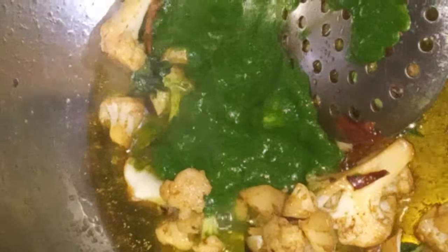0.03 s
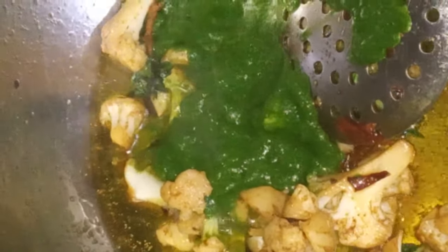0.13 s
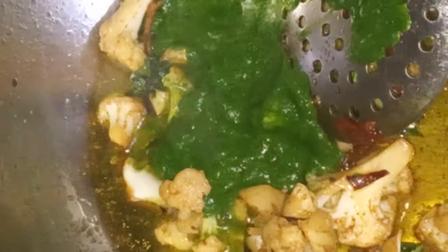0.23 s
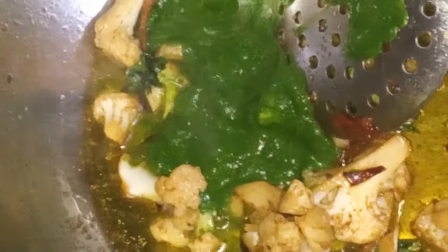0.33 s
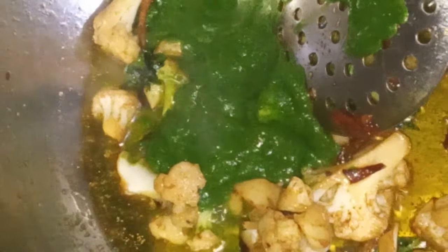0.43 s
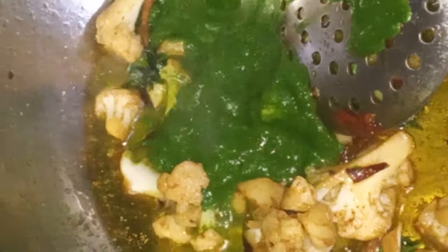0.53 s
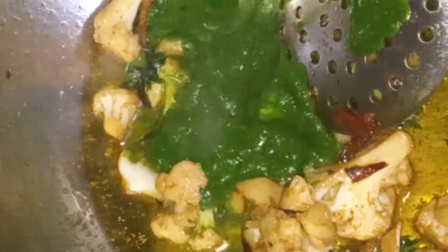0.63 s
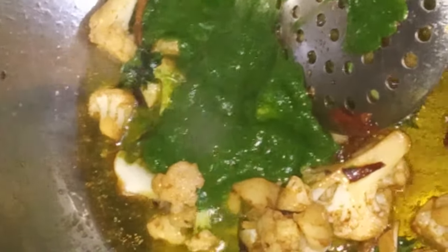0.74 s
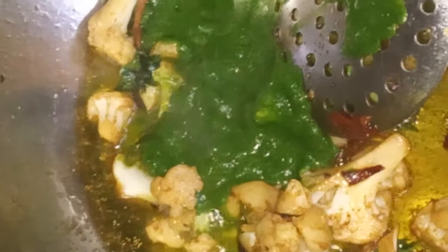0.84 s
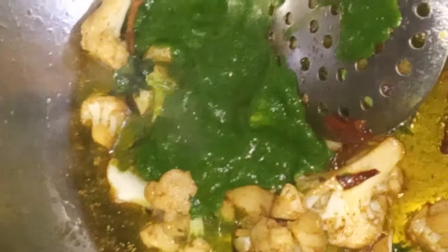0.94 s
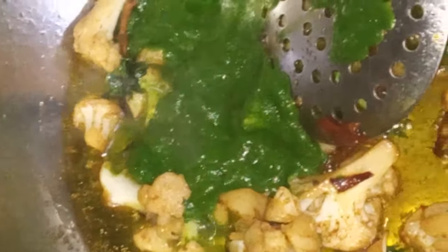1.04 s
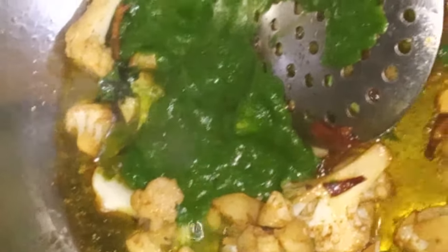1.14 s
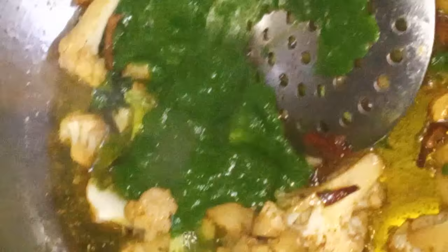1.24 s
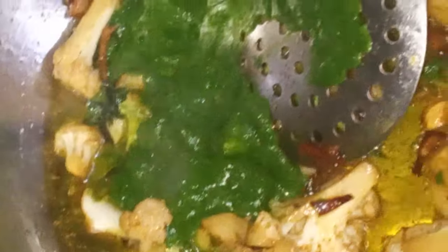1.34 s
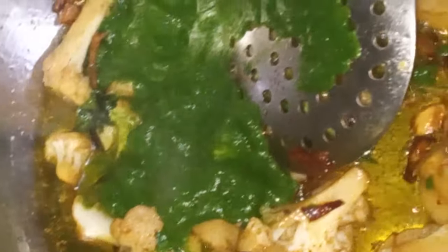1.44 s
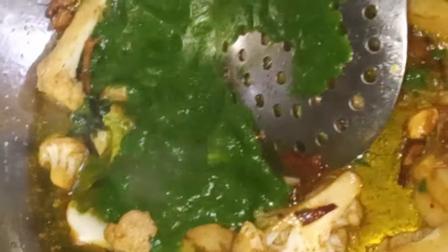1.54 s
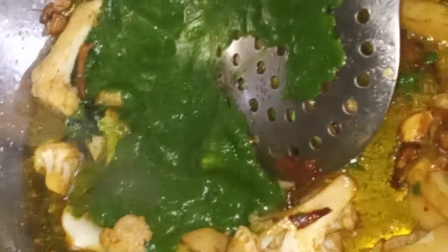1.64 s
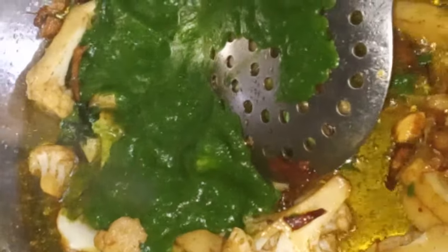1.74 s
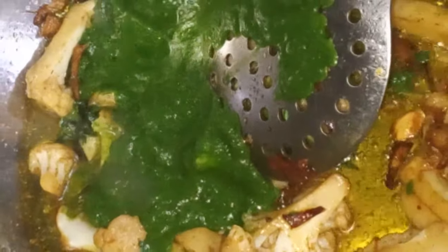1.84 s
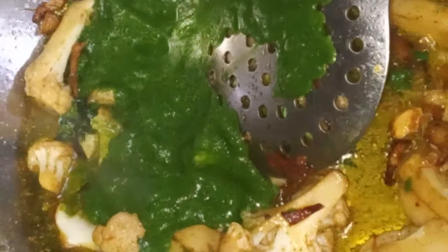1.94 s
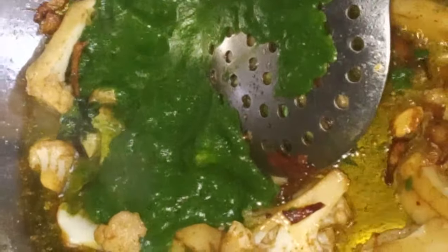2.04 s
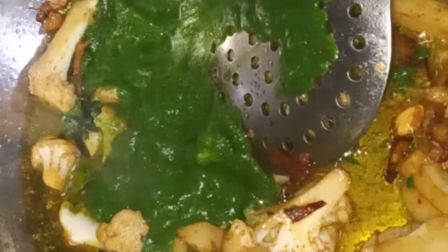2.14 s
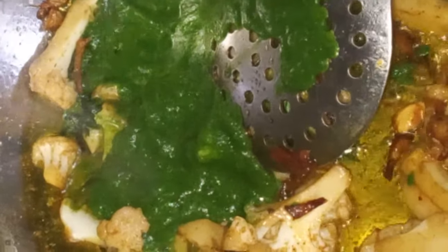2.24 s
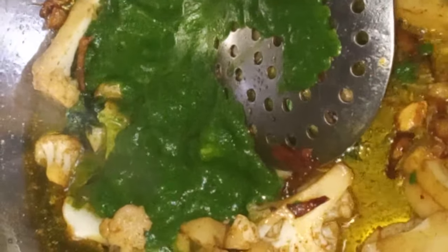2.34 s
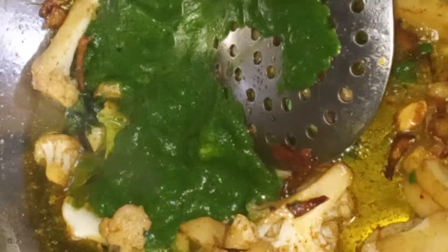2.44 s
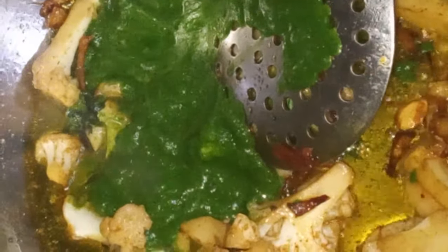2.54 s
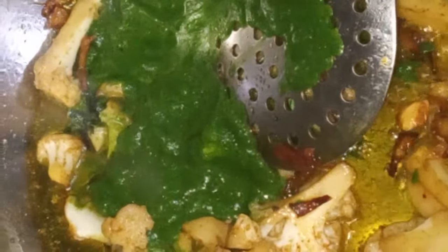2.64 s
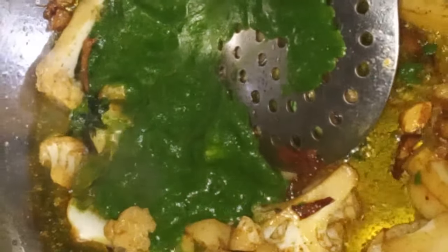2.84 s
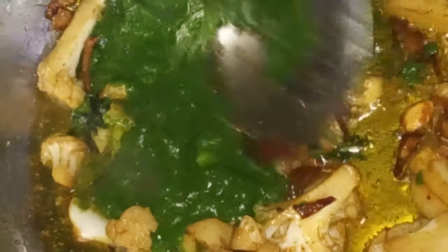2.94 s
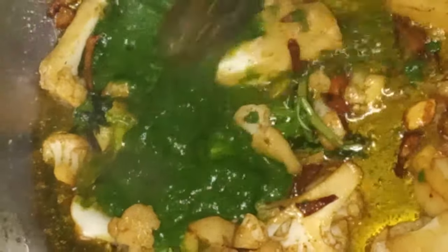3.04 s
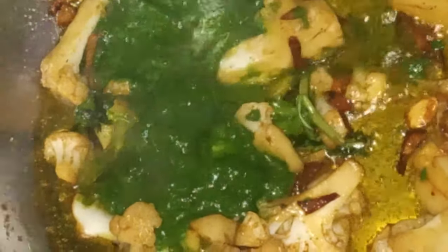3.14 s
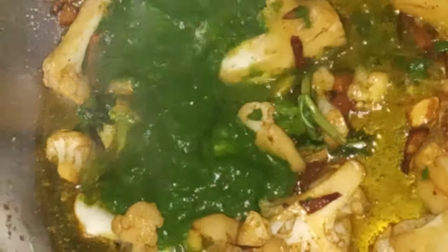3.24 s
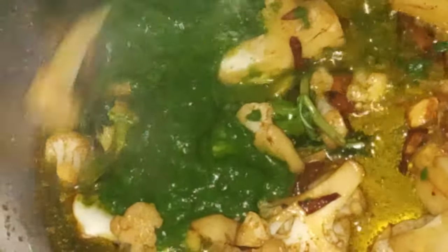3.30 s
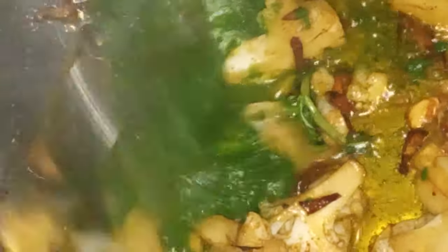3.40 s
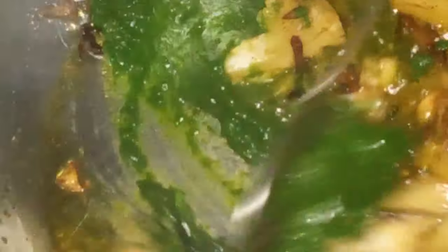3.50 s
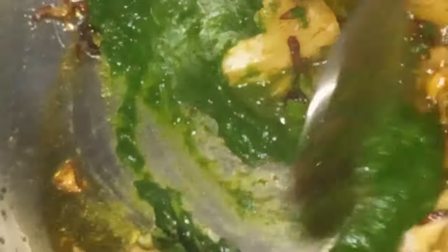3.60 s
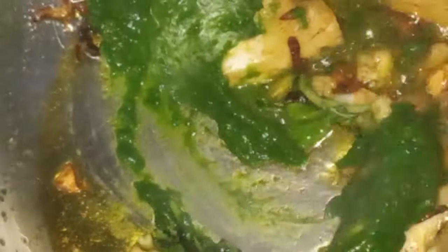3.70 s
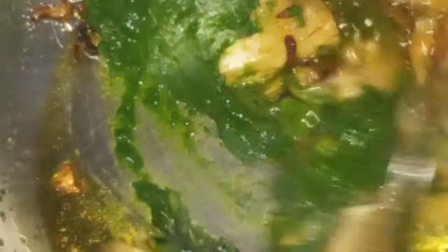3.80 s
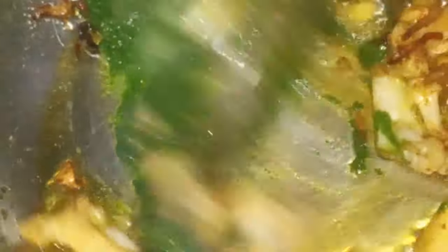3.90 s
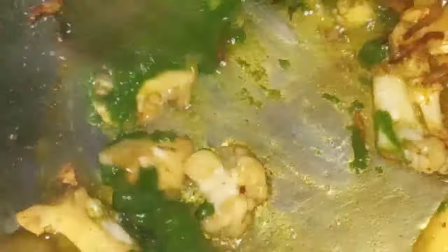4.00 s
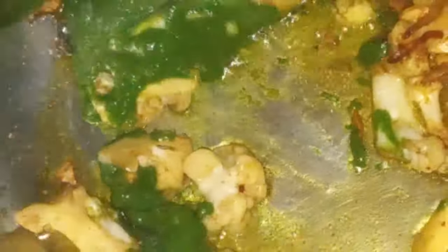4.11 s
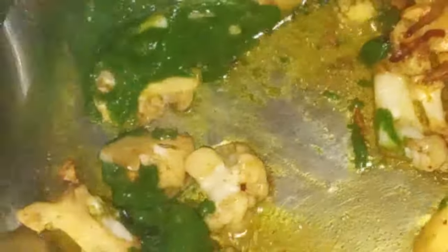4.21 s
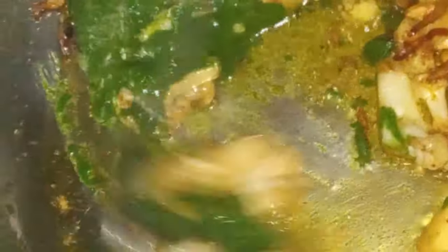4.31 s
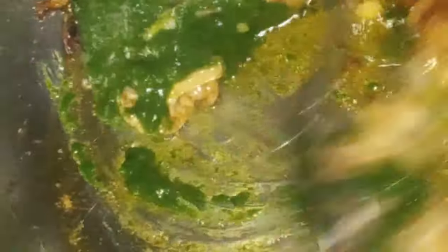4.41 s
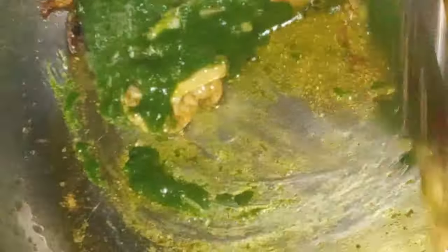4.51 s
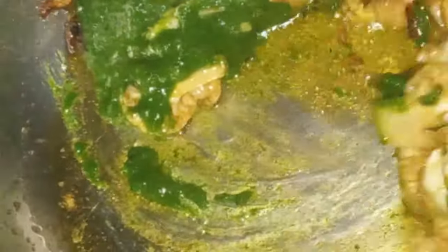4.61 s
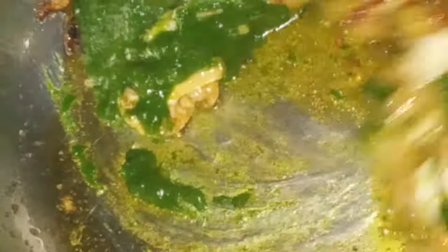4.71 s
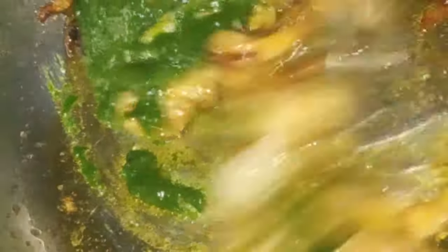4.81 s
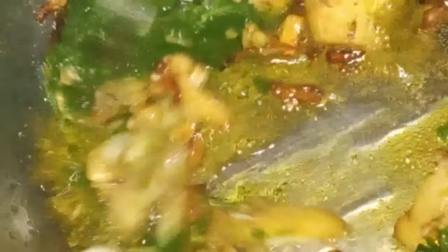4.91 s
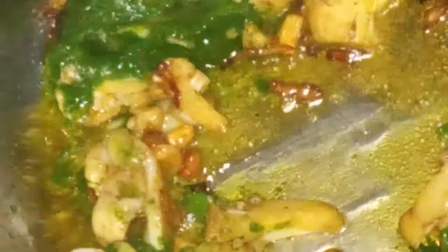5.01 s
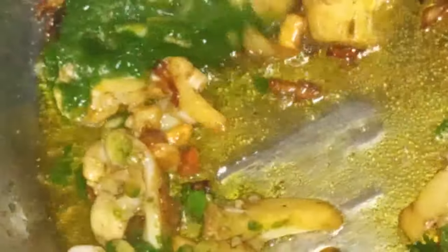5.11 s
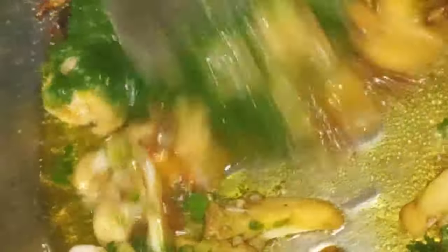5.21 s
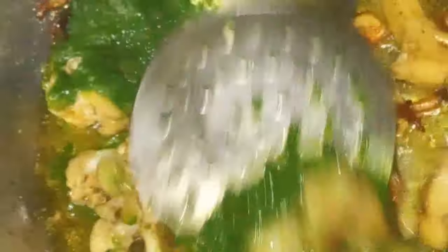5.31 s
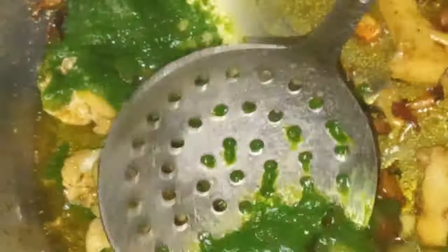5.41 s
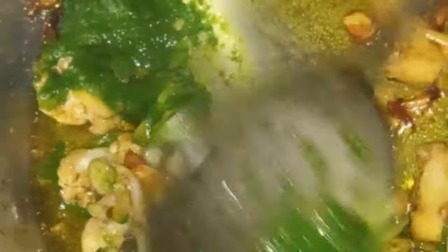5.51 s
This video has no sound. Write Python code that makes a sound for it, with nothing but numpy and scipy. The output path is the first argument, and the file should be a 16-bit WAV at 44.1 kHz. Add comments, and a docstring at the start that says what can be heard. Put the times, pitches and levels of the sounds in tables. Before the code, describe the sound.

Oil fries steadily with a few thick bubbling plops, until a metal spatula starts tapping, scraping and squeaking in the steel pan.

```python
"""Spinach puree and cauliflower sizzle in oil in a steel pan; one microphone close by, in a small kitchen.
Vapour bubbles burst in the oil and set the pan singing faintly; now and then steam plops through the puree.
A slotted steel spatula rests in it, squeaking softly, and after three seconds stirs: it knocks on the
food-damped pan, clangs once on the bare wall, scrapes along the bottom and squeaks.
Behind the pan are the kitchen's low hum and the short echo of its hard walls."""
import sys
import numpy as np
from scipy import signal
from scipy.fft import rfft, irfft
from scipy.io import wavfile

SR = 44100
rng = np.random.default_rng(int(sys.argv[2]) if len(sys.argv) > 2 else 0)


def output_pcm(signal):
    """Save a mono or channel-first signal as 16-bit PCM at the path in sys.argv[1].

    Samples are clipped to [-1, 1] before scaling.
    """
    pcm = np.clip(np.atleast_2d(signal).T, -1, 1) * 32767
    wavfile.write(sys.argv[1], SR, np.round(pcm).astype(np.int16))


N = 244755
TIME, RING_TIME = np.arange(N) / SR, np.arange(SR // 2) / SR

# Levels in spectra and modes are relative; spectra are per Hz.
HUM_SPECTRUM = [(25, -6), (55, -12.5), (85, -0.5), (115, 6), (160, -5.5), (250, -3.5), (500, -5.5),
                (780, 0.5), (1200, -18.5)]  # kitchen background: f/Hz, level/dB
KITCHEN_DECAY = [(200, 0.27), (1000, 0.28), (5000, 0.12), (14000, 0.1)]  # echo of the walls: f/Hz, t60/s

# spatula knocks: t/s, low thud/dB, hollow knock/dB, steel clack/dB, bright tick/dB
SPATULA_KNOCKS = [(3.22, -35.5, -34, -37.5, -34), (3.2750, -33.5, -33, -55.5, -53),
                  (3.4660, -74, -46.5, -58, -71), (3.8900, -40.5, -37, -33, -31),
                  (4.2344, -43, -36, -45.5, -50), (4.6821, -38, -45.5, -38, -33.5),
                  (4.8010, -34.5, -39.5, -35, -72), (4.828, -49, -54, -46, -73),
                  (5.0790, -33.5, -32.5, -32.5, -28.5)]
THUD_MODES = [(255, -4, 0.076), (335.3, 5.5, 0.064), (400, 2.5, 0.051)]  # deepest ring of the loaded pan: f/Hz, level/dB, t60/s
HOLLOW_MODES = [(481, -5.5, 0.01), (627, -16, 0.051), (704, -10, 0.02)]  # its hollow ring above that: f/Hz, level/dB, t60/s
BLADE_MODES = [(1316, -8, 0.062), (1352, -3, 0.031), (1830, -5, 0.027), (2028, 9.5, 0.019),
               (2197, -7.5, 0.085), (2990, -2.5, 0.055), (3572, -6, 0.061), (4410, -3.5, 0.054),
               (5070, -2.5, 0.034)]  # spatula blade: f/Hz, level/dB, t60/s
BLADE_OVERTONES = [(5600, -33, 0.12), (6030, 11, 0.097), (7100, 12, 0.069), (7500, -20, 0.12),
                   (7260, -8, 0.026), (8220, 22, 0.052), (12230, 7.5, 0.06)]  # its short bright ring: f/Hz, level/dB, t60/s
TICK_SPECTRUM = [(1100, -6), (2000, -19), (4000, -11.5), (6200, -14.5), (7500, 3.5), (8400, -15),
                 (9400, -13), (11400, -6), (13500, -44), (15500, -9)]  # steel meeting steel: f/Hz, level/dB
BUMP_SPECTRUM = [(110, -16), (300, -8), (560, -8.5), (900, -5), (1400, -4), (2200, -31), (4000, -61)]  # food bumping the pan: f/Hz, level/dB

WALL_STRIKES = [(3.89, -24), (3.9000, -35), (3.9220, -28), (3.937, -32), (3.9580, -36)]  # the blade hits the pan wall and chatters: t/s, level/dB
WALL_MODES = [(335, -11, 0.44), (766, 7, 0.31), (924, 5.5, 0.34), (1130, 7, 0.29), (1180, 4, 0.47),
              (1365.6, -5.5, 0.69), (1480, -16, 0.13), (2180, 12, 0.36), (2370, -1, 0.19),
              (2350, 13, 0.055), (2534, 5, 0.12), (3100, -39, .26), (3130, -38, 0.12), (3910, 1.5, 0.4),
              (3930, -11, 0.43), (3860, 8.5, 0.2), (5023, 2, 0.2), (5600, -23, 0.28), (6180, 22.5, 0.039),
              (7100, 0, 0.17)]  # bare pan wall: f/Hz, level/dB, t60/s
CROWD_SPECTRUM = [(200, -17), (290, 5.5), (480, -15), (680, -5), (1100, 5), (1600, -6), (2300, 3.5),
                  (3000, -7.5), (7600, -4), (9300, -25), (11400, -21.5), (15000, -28)]  # the wall's crowd of lesser modes: f/Hz, level/dB
CROWD_DECAY = [(250, 0.42), (1100, 0.33), (2500, 0.33), (7000, 0.22), (12000, 0.54)]  # how long those ring: f/Hz, t60/s

# strokes over the bottom: firmest press t/s, build-up/s, steel grinding/dB, wet hiss/dB
BLADE_STROKES = [(3.08, 0.43, -66, -53), (3.499, 0.081, -48.5, -58), (3.718, 0.043, -57, -44.5),
                 (3.863, 0.2, -47, -69), (4.4, 0.023, -44.5, -43), (4.482, .1, -51.5, -48.5),
                 (4.585, 0.035, -48, -62), (4.67, 0.085, -45, -57), (4.765, 0.12, -42, -49),
                 (4.85, 0.17, -49, -42.5), (5.0, 0.22, -69, -45), (5.127, 0.022, -40, -41),
                 (5.2, 0.037, -35, -33.5), (5.296, 0.057, -43.5, -38.5)]
FOOD_SHOVES = [(3.42, -44.5), (3.495, -52), (3.788, -55.5), (3.863, -60), (4.295, -52.5), (4.75, -44.5),
               (4.85, -57), (5.126, -37), (5.197, -42.5)]  # the blade pushes a heap: t/s, level/dB
SHOVE_SPECTRUM = [(190, -18.5), (340, 2.5), (510, -8), (660, -1.5), (850, -5), (1100, -16.5), (2500, -40)]  # pushed food: f/Hz, level/dB
GRIT_SPECTRUM = [(700, -15.5), (1050, -26.5), (1400, 7), (1800, -9), (2400, -2), (3200, -5), (4500, -3.5),
                 (8000, -15), (10000, -24)]  # grit under the blade: f/Hz, level/dB
HISS_SPECTRUM = [(2500, -33), (4200, -9), (5300, 0.5), (6200, -1.5), (7000, -13), (7900, -4), (9400, -25.5),
                 (11400, -3), (13500, -28), (15600, -13)]  # wet food on hot steel: f/Hz, level/dB
BLADE_SQUEAKS = [(1.091, 0.091, 3620, 250, -59), (1.507, 0.13, 3690, 140, -62.5),
                 (1.669, 0.062, 3590, 160, -58.5), (2.472, 0.035, 3700, 200, -54.5),
                 (3.398, 0.057, 655, 40, -45), (3.778, 0.085, 781, 59.6, -56.5),
                 (3.81, 0.071, 3350, 900, -51), (4.316, 0.15, 6170, 199, -52.5),
                 (4.437, 0.081, 3050, 505, -49), (5.101, 0.078, 7520, 700, -41.5),
                 (5.147, 0.023, 1420, 153, -37), (5.186, 0.017, 2430, 201.1, -38.5),
                 (5.383, 0.17, 3840, 820, -51), (5.413, 0.061, 3720, 100, -36.5),
                 (5.46, .1, 3620, 274, -44.5)]  # judder on the steel: t/s, length/s, f/Hz, rasp width/Hz, level/dB

# steam bubbles in the puree: t/s, puff f/Hz, puff level/dB, gulp delay/s, gulp f/Hz, gulp level/dB
STEAM_PLOPS = [(0, 1700, -84, 0, 292, -63), (0.405, 2060, -59, 0, 313, -68),
               (1.3, 1760, -41.5, 0.047, 247, -48.5), (1.965, 930, -55.5, 0, 278, -63),
               (2.165, 1720, -48.5, .1, 240, -63.5), (2.67, 644, -69.5, 0, 250, -69.5)]
PAN_RESONANCES = [(371, 72, -79.5), (767, 68, -76), (1327, 120, -72.5), (1518, 58, -76.5), (2510, 280, -68),
                  (2942, 370, -71), (3595, 87, -68)]  # stirred by the bubbling: f/Hz, width/Hz, level/dB
OIL_SPECTRUM = [(500, -24), (800, -16.5), (1050, -14.5), (1380, -15.5), (1800, -7.5), (2600, -10.5),
                (4300, -7), (6000, 1.5), (8200, -0.5), (9700, -7.5), (11400, 4), (12700, -9), (14000, -13),
                (15400, -5.5)]  # frying oil: f/Hz, level/dB
FRYING_LEVEL = [(0, -50.5), (0.6, -50), (1.2, -50), (1.8, -50), (2.4, -50.5), (3.0, -49.5), (3.6, -47.5),
                (4.2, -48.5), (4.8, -46.5), (5.55, -46.5)]  # how hard it fries: t/s, level/dB
OIL_SPITS = [(2.884, -66), (3.513, -58), (4.171, -81), (4.928, -48), (4.992, -53), (5.254, -42),
             (5.365, -50)]  # single spits: t/s, level/dB


def amp(db):
    """Decibels to gain."""
    return 10 ** (np.asarray(db) / 20)


def unit(x):
    """Scales a steady sound to rms 1."""
    return x / np.sqrt(np.mean(x ** 2) + 1e-20)


def unit_blow(x, blow_s=0.03):
    """Scales a short sound to the energy of rms 1 over one blow."""
    return x / np.sqrt(np.sum(x ** 2) / (blow_s * SR) + 1e-20)


def read(points, hz):
    """Reads a table over log frequency."""
    f, value = np.transpose(points)
    return np.interp(np.log(hz + 1), np.log(f + 1), value)


def add(mix, s, sound):
    """Adds a sound at time s."""
    part = mix[max(round(s * SR), 0):][:len(sound)]
    part += sound[:len(part)]


def colour(x, spectrum, size=4096):
    """Causal filter with the given spectrum, falling away below its first point."""
    hz = abs(np.fft.fftfreq(size, 1 / SR))
    log_gain = np.log(amp(read(spectrum, hz)) * np.clip(hz / spectrum[0][0], 0.01, 1) ** 2)
    taps = np.fft.ifft(np.exp(np.conj(signal.hilbert(log_gain)))).real[:size // 2]
    return signal.oaconvolve(x, taps)[:len(x)]


def ring(modes, detune=0, scatter_db=0):
    """Dying modes; pitch and share change with the spot that is struck."""
    t, out = RING_TIME, 0
    for (hz, db, t60), (shift, share, sign) in zip(modes, rng.uniform(-1, 1, (len(modes), 3))):
        decay = amp(db + scatter_db * share - 60 * t / t60)
        out = out + np.sign(sign) * decay * np.sin(2 * np.pi * hz * (1 + detune * shift) * t)
    return unit_blow(out)


def tail(t60s):
    """Noise whose bands die at their own speeds."""
    hz, t, bands = signal.stft(rng.standard_normal(len(RING_TIME)), SR, nperseg=256)
    decay = amp(-60 * t / read(t60s, hz)[:, None])
    return signal.istft(bands * decay, SR, nperseg=256)[1][:len(RING_TIME)]


def wander(per_s):
    """Smooth random drift of rms 1."""
    steps = int(N / SR * per_s * 8) + 2
    lowpass = np.exp(-(8 * np.fft.rfftfreq(steps)) ** 2)
    smooth = irfft(rfft(rng.standard_normal(steps)) * lowpass, steps)
    return unit(np.interp(TIME, np.linspace(0, N / SR, steps), smooth))


def crackle(per_s, spread_db):
    """Random tiny clicks; the wider the spread, the more a few stand out."""
    size = amp(spread_db * np.minimum(rng.exponential(1, N), 5))
    return unit(size * rng.choice([-1, 1], N) * (rng.random(N) < per_s / SR))


def shifting(x, depth_db, span_hz, span_s):
    """Narrow resonances come and go as the contact moves over the pan."""
    bands = signal.stft(x, SR, nperseg=1024, noverlap=768)[2]
    field = np.fft.fft2(rng.standard_normal(bands.shape))
    across = np.fft.fftfreq(bands.shape[0], SR / 1024)[:, None] * span_hz
    along = np.fft.fftfreq(bands.shape[1], 256 / SR) * span_s
    patches = unit(np.fft.ifft2(field * np.exp(-(2 * across) ** 2 - (2 * along) ** 2)).real)
    return unit(signal.istft(bands * amp(depth_db * patches), SR, nperseg=1024, noverlap=768)[1][:N])


def swing(width_hz, size):
    """The random swing of a resonance of the given width, fed by countless small kicks."""
    kicks = rng.standard_normal(size) + 1j * rng.standard_normal(size)
    return signal.sosfilt(signal.butter(2, width_hz / 2, fs=SR, output="sos"), kicks)


def swell(s, rise_s, fall_s):
    """Grows by 20 dB per rise_s up to time s, then dies by 20 dB per fall_s."""
    return amp(-20 * np.minimum(np.maximum((s - TIME) / rise_s, (TIME - s) / fall_s), 10))


def puff(pitch_hz, width, swell_s, t60):
    """A soft rush of air through a cavity swells and dies; width is relative to the pitch."""
    t = RING_TIME
    hz = np.fft.rfftfreq(len(t), 1 / SR) + 1
    cavity = 1 / (1 + (np.log(hz / pitch_hz) / width) ** 4)
    rush = unit(irfft(rfft(rng.standard_normal(len(t))) * cavity, len(t)))
    return rush * np.minimum(t / swell_s, 1) * amp(-60 * np.maximum(t - swell_s, 0) / t60)


def kitchen_hum():
    """Room tone: a steady low noise, well behind the pan."""
    return amp(-70) * unit(colour(rng.standard_normal(N), HUM_SPECTRUM))


def kitchen_echo(x):
    """The near, hard walls send a short echo back to the microphone."""
    echoes = tail(KITCHEN_DECAY) * (1 - np.exp(-RING_TIME / 0.0024))
    return signal.oaconvolve(x, echoes / np.linalg.norm(echoes))[:N]


def squeaks():
    """Stick and slip of the blade locks onto one mode; the looser the lock, the raspier."""
    out = np.zeros(N)
    for s, length_s, hz, width_hz, db in BLADE_SQUEAKS:
        grip = swing(width_hz, size=len(RING_TIME))
        grip = grip / np.sqrt(abs(grip) + 1e-12)  # friction limits the swing
        tone = (grip * np.exp(2j * np.pi * hz * RING_TIME)).real[-round(length_s * SR):]
        add(out, s, amp(db) * unit(tone * signal.windows.tukey(len(tone), 0.6)))
    return out


def stirring():
    """The blade shoves food, slips over the steel and lays wet food on the hot metal."""
    shove = sum(amp(db) * swell(s, rise_s=0.037, fall_s=0.052) for s, db in FOOD_SHOVES)
    grind = sum(amp(db) * swell(s, rise_s, fall_s=0.042) for s, rise_s, db, _ in BLADE_STROKES)
    flare = sum(amp(db) * swell(s, rise_s, fall_s=0.05) for s, rise_s, _, db in BLADE_STROKES)
    food = unit(colour(crackle(per_s=2500, spread_db=0), SHOVE_SPECTRUM)) * shove
    grit = colour(crackle(per_s=5400, spread_db=1.5) * amp(3.5 * wander(per_s=180)), GRIT_SPECTRUM)
    slips = shifting(grit, depth_db=4.5, span_hz=140, span_s=0.07) * grind
    upper_wall = ring([mode for mode in WALL_MODES if mode[0] > 1250])
    wall_ring = signal.oaconvolve(slips, upper_wall / np.linalg.norm(upper_wall))[:N]
    steam = colour(crackle(per_s=6000, spread_db=3), HISS_SPECTRUM)
    hiss = shifting(steam, depth_db=4, span_hz=170, span_s=0.05) * flare
    return food + amp(-1) * slips + amp(-10) * wall_ring + hiss


def knocks():
    """The spatula lands on the loaded pan: a tick, a clack of the blade and a dull thud."""
    out, t = np.zeros(N), RING_TIME
    steel_onset = 1 - np.exp(-t / 0.0003)
    cushioned_onset = 1 - np.exp(-t / 0.0015)  # the food softens the blow
    for s, thud_db, hollow_db, clack_db, tick_db in SPATULA_KNOCKS:
        contact = rng.standard_normal(len(t)) * (np.exp(-t / 0.0032) + 0.66 * np.exp(-t / 0.012))
        tick = unit_blow(colour(contact, TICK_SPECTRUM))
        tick += amp(-6) * ring(BLADE_OVERTONES, detune=0.018, scatter_db=2.5)
        clack = ring(BLADE_MODES, detune=0.061, scatter_db=8)
        clack += amp(-9.5) * unit_blow(colour(contact, GRIT_SPECTRUM))
        add(out, s, (amp(tick_db) * tick + amp(clack_db) * clack) * steel_onset)
        thud = amp(thud_db) * ring(THUD_MODES, detune=0.022)
        hollow = amp(hollow_db) * ring(HOLLOW_MODES, detune=0.026)
        bump = amp(hollow_db - 9) * unit_blow(colour(contact, BUMP_SPECTRUM))
        add(out, s, (thud + hollow) * cushioned_onset + bump)
    # the microphone rolls off below 200 Hz, so the knocks have little bass
    return signal.sosfilt(signal.butter(3, 200, "high", fs=SR, output="sos"), out)


def clang():
    """The blade chatters on the bare pan wall, which rings freely."""
    out = np.zeros(N)
    for s, db in WALL_STRIKES:
        crowd = unit_blow(colour(tail(CROWD_DECAY), CROWD_SPECTRUM))
        modes = ring(WALL_MODES, detune=0.003, scatter_db=2)
        add(out, s, amp(db) * (amp(-0.5) * crowd + amp(-6) * modes))
    return signal.sosfilt(signal.butter(2, 190, "high", fs=SR, output="sos"), out)


def pan_singing():
    """Bubbles on the steel make the pan's resonances chirp faintly, each in its own spurts."""
    out = np.zeros(N)
    for hz, width_hz, db in PAN_RESONANCES:
        tone = (swing(width_hz, size=N) * np.exp(2j * np.pi * hz * TIME)).real
        out += amp(db) * unit(tone * amp(4 * wander(per_s=12)))
    return out


def plops():
    """Steam pushes through the thick puree: a puff with some spray, a low gulp as the crater closes."""
    out = np.zeros(N)
    for s, puff_hz, puff_db, delay_s, gulp_hz, gulp_db in STEAM_PLOPS:
        steam = puff(puff_hz, width=0.22, swell_s=0.0058, t60=0.33)
        spray = puff(puff_hz, width=1, swell_s=0.013, t60=0.48)
        add(out, s, amp(puff_db) * (steam + amp(-5.5) * spray))
        gulp = puff(gulp_hz, width=0.23, swell_s=0.024, t60=0.39)
        overtone = puff(gulp_hz * 1.7, width=0.84, swell_s=0.024, t60=0.39)
        add(out, s + delay_s, amp(gulp_db) * (gulp + amp(-8) * overtone))
    return out


def sizzle():
    """Close to the microphone, countless vapour bubbles burst in the oil in small flurries; a few spit."""
    pops = crackle(per_s=9000, spread_db=1.5) * amp(0.74 * wander(per_s=41))
    oil = shifting(colour(pops, OIL_SPECTRUM), depth_db=1.84, span_hz=500, span_s=0.024)
    oil *= amp(np.interp(TIME, *np.transpose(FRYING_LEVEL)))
    for s, db in OIL_SPITS:
        snap = rng.standard_normal(len(RING_TIME)) * np.exp(-RING_TIME / 0.0017)
        add(oil, s, amp(db) * unit_blow(colour(snap, HISS_SPECTRUM)))
    return oil


def scene():
    """Mono, close to the pan: all of it direct, with some kitchen echo on the knocks and strokes."""
    blows = knocks()
    strokes = stirring() + squeaks()
    frying = sizzle() + pan_singing() + plops()
    hum = kitchen_hum()
    strikes = blows + amp(-6.5) * kitchen_echo(blows) + clang()
    scrapes = strokes + amp(-10.5) * kitchen_echo(strokes)
    return (hum + scrapes + strikes + frying)[None]


def record(dry, edge_hz=16000):
    """The recorder's band limit."""
    lowpass = signal.firwin(401, edge_hz, window=("kaiser", 8), fs=SR)
    return signal.oaconvolve(dry, lowpass[None], "same")


dry = scene()
out = record(dry)
output_pcm(out)
```